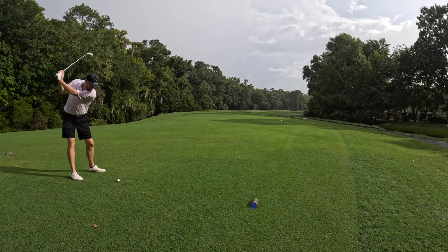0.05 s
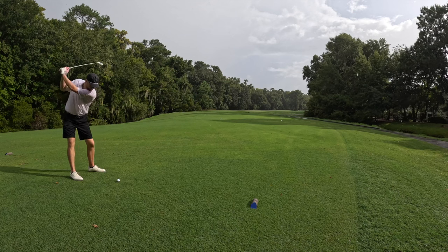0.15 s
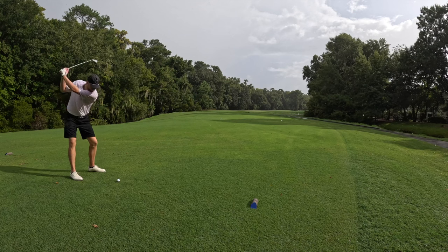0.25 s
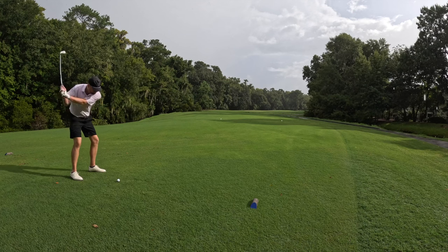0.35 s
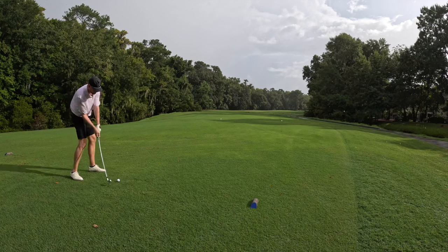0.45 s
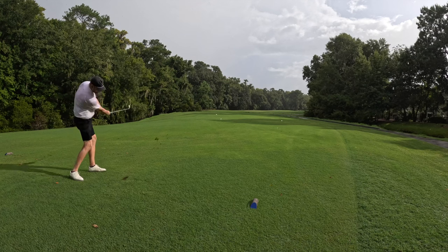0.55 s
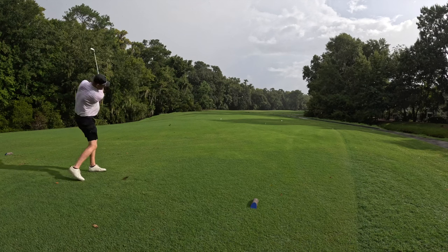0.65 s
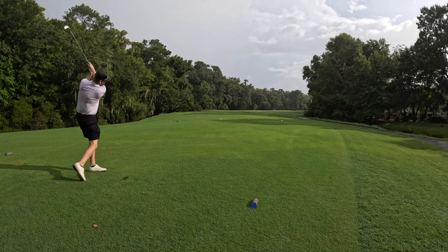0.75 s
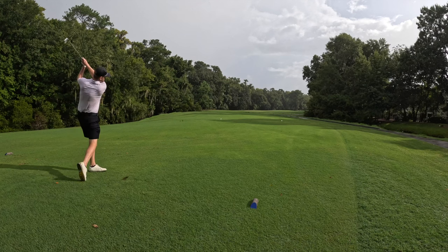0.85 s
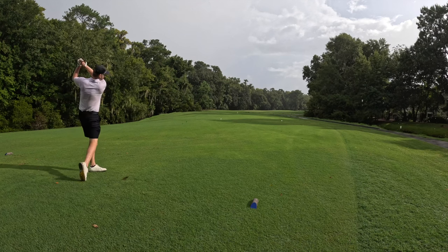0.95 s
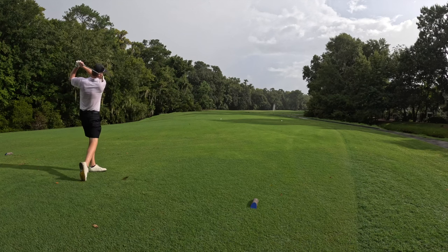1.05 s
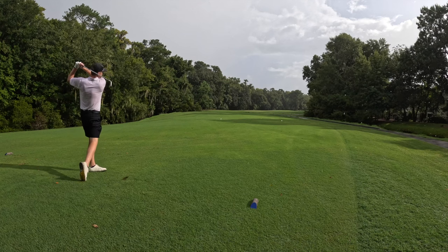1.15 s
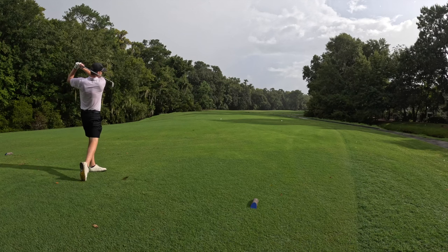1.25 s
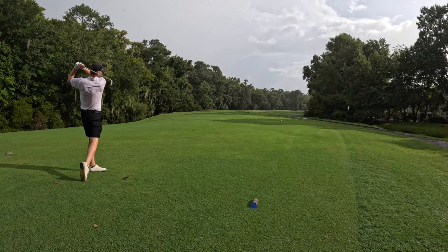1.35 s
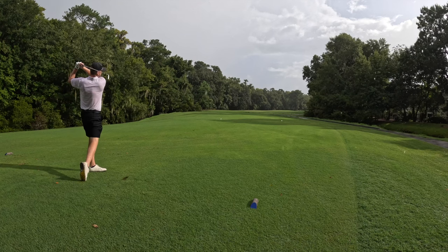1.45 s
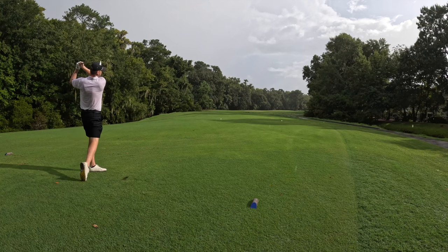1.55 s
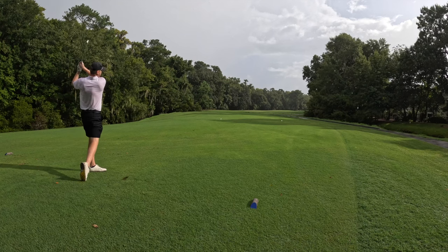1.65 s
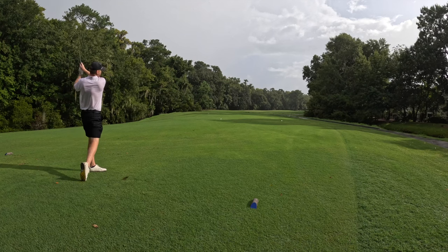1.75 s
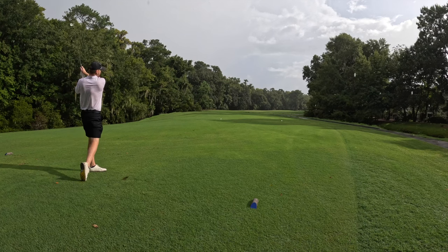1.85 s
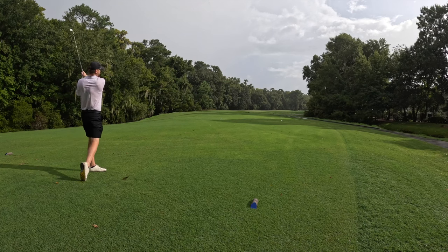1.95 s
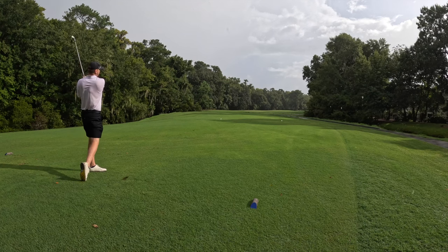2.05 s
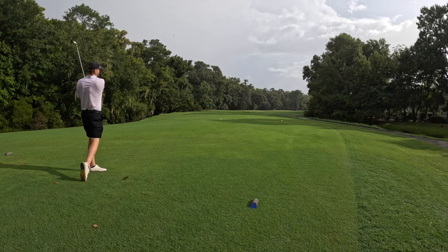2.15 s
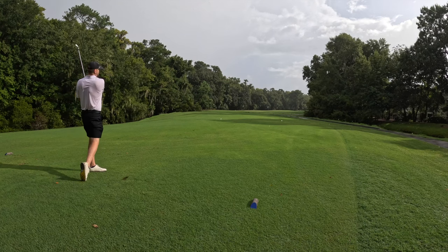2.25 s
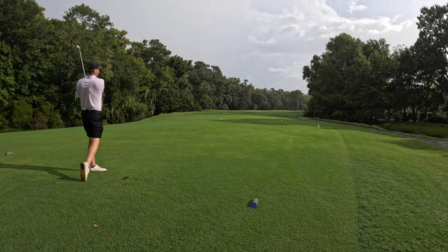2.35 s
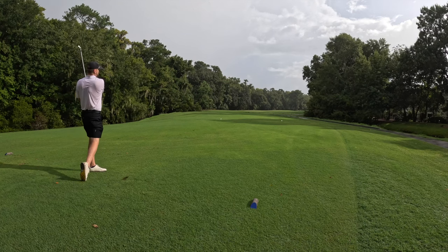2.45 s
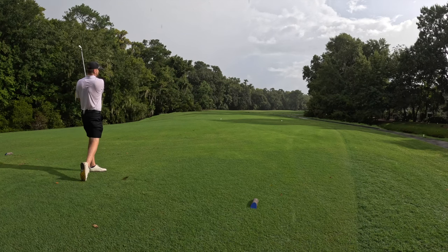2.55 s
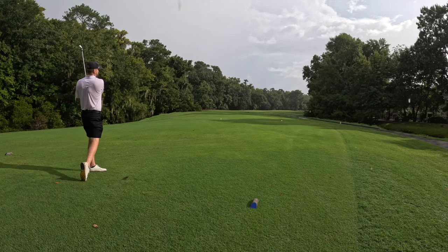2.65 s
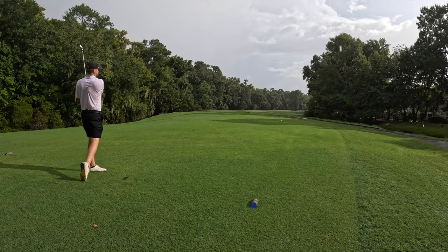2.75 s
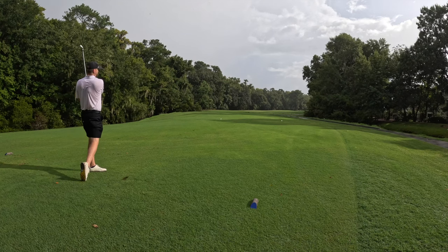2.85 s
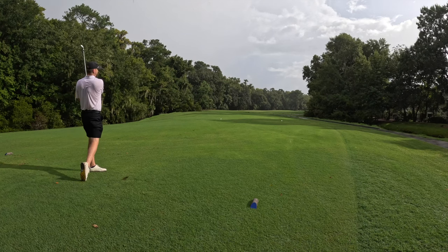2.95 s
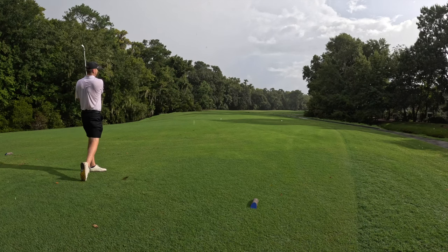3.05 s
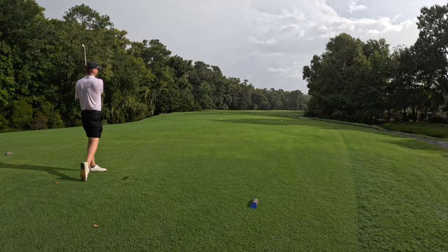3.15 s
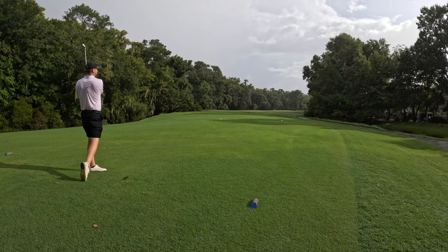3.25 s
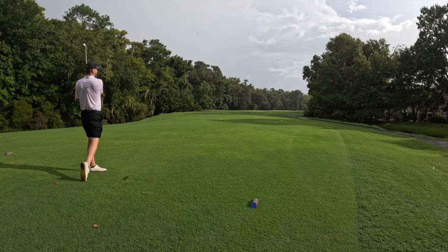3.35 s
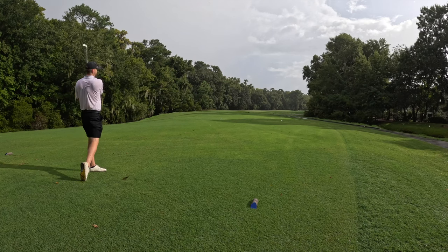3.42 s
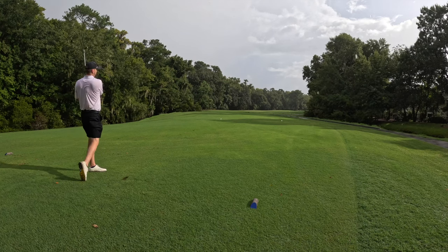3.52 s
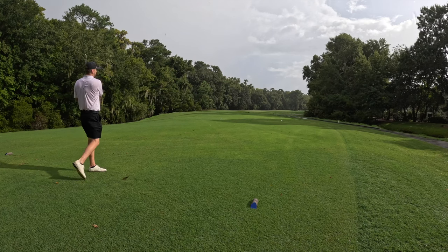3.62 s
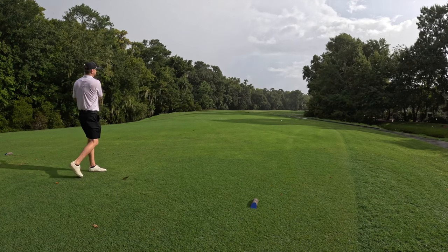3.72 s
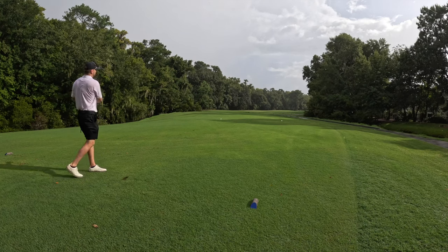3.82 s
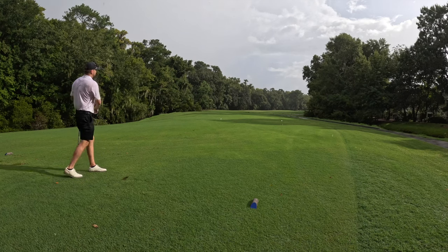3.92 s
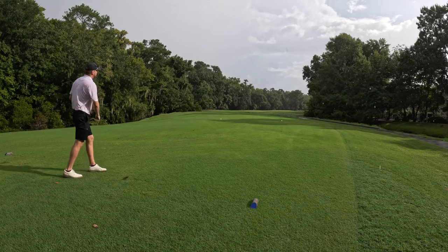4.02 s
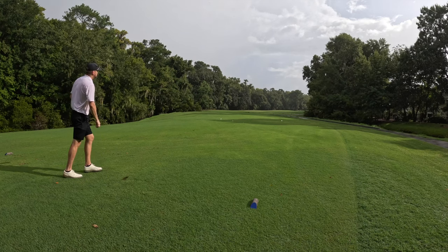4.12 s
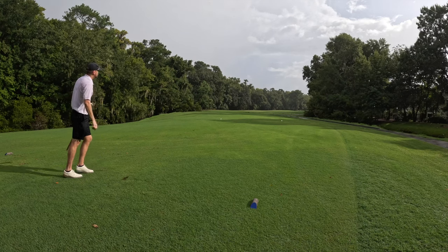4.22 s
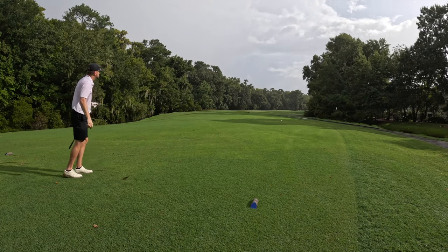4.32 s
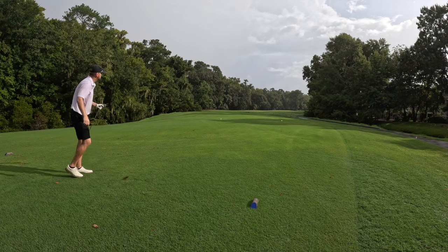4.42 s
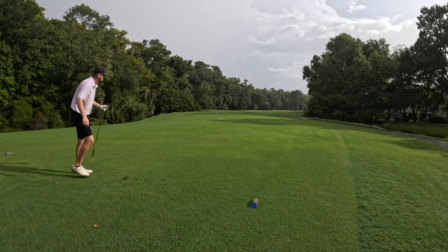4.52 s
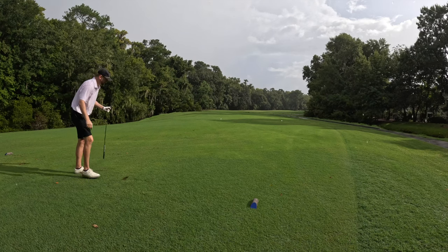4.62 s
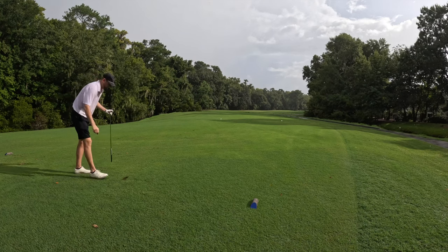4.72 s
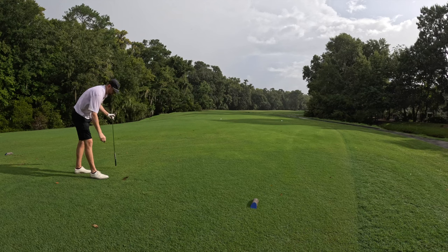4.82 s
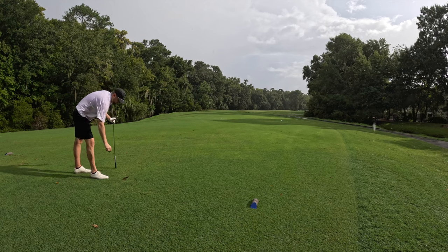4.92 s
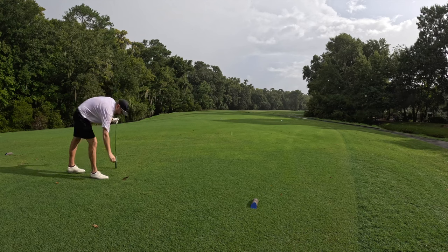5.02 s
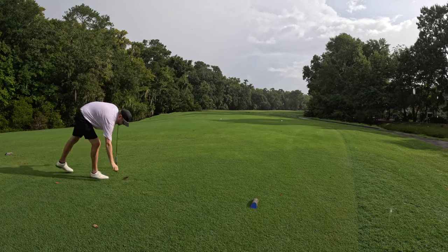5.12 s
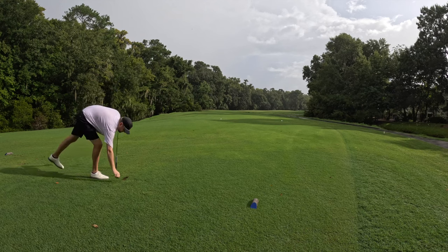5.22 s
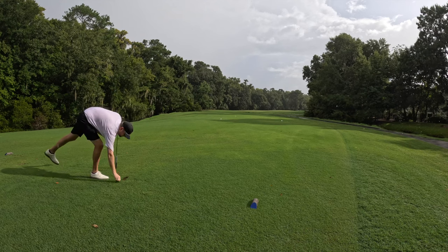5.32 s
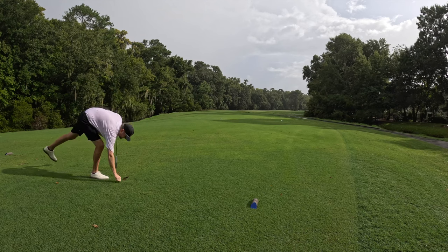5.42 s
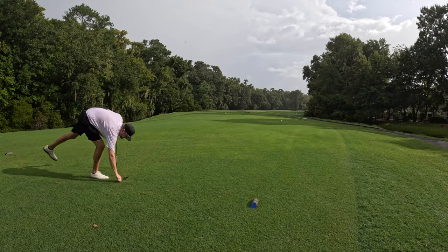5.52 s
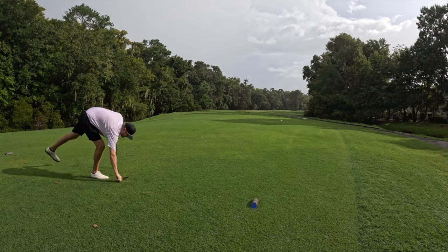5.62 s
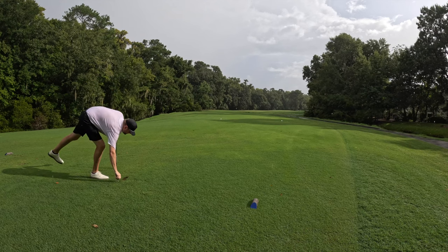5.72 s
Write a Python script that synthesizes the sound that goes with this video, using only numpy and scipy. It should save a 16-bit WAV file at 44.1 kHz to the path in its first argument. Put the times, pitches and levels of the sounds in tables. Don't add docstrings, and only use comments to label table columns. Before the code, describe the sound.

A golf club whooshes and cracks a ball off turf between two hoarse crow caws, then quiet fairway air, small bird chirps and bumps on the camera stand.

```python
import sys
import numpy as np
from scipy import signal
from scipy.fft import rfft, irfft
from scipy.io import wavfile
from scipy.ndimage import uniform_filter1d

SR = 44100
rng = np.random.default_rng(int(sys.argv[2]) if len(sys.argv) > 2 else 0)


def nominal_scale(level):
    x = np.asarray(level, float) / 20
    return 10 ** x


def output_pcm(signal):
    pcm = np.clip(np.atleast_2d(signal).T, -1, 1) * 32767
    wavfile.write(sys.argv[1], SR, np.round(pcm).astype(np.int16))


N = 254456
STRIKE_S = .571814

# frequency in Hz, level in dB per Hz.
LEAF_SPECTRUM = [(150, -6.5), (250, -3.5), (400, -5), (800, -5.5), (1050, -2), (1400, -3), (2780, -7.5),
                 (6250, -13), (7600, -16), (8300, -21), (10200, -26), (10900, -37.5), (12300, -32),
                 (14500, -41), (15300, -53)]
# frequency in Hz, level in dB per Hz.
TRAFFIC_SPECTRUM = [(38, -26), (65, -1.5), (92, 0.5), (119, -8.5), (188, -8.5), (226, -11.5), (295, -23.5),
                    (323, -36.5), (400, -24), (520, -47), (880, -120)]
# frequency in Hz, level in dB per Hz.
GUST_SPECTRUM = [(10, -12), (20, -5), (38, 9), (60, 2.5), (75, -6.5), (110, -48.5)]
# centre in seconds, level in dB, half length in seconds.
STIRS = [
    (.3, -53, .2),
    (.76, -54, .12),
    (2.7, -56, .8),
    (4.6, -55.5, 1.3),
]
# centre in seconds, level in dB, half length in seconds.
PASSES = [
    (.13, -52, .06),
    (.55, -55, .2),
    (1.55, -58, .3),
    (2.6, -54, .4),
    (3.45, -53, .12),
    (4.25, -52, .45),
    (5.75, -50, .3),
]
# centre in seconds, level in dB, half length in seconds.
GUSTS = [(.0, -53, .1), (.3, -48, .07), (.65, -45, .17), (1.2, -57, .15), (1.72, -45.5, .12),
         (2.25, -48, .1), (2.52, -46.5, .1), (3.4, -51, .2), (3.95, -48, .15), (4.49, -48, .08),
         (4.7, -54, .12), (5.3, -47, .1)]
# frequency in Hz, left-right correlation 0-1.
STEREO_LIKENESS = [(60, .99), (130, .965), (290, .89), (640, .74), (1410, .63), (3100, .49), (4400, .6),
                   (4800, .968), (6400, .972), (7300, .958), (9300, .96), (11000, .35)]
# frequency in Hz, left over right in dB.
STEREO_LEAN = [(60, -.8), (200, -1.5), (380, -.8), (700, .5), (1290, 1.5), (2380, 1.5), (4700, 0),
               (9600, 0), (12000, 2.5)]
# start in seconds, nasal part in seconds, rattle in seconds, effort in dB, top pitch in Hz.
CAWS = [
    (.08, .115, .2, -47.5, 612),
    (.708, .13, .19, -50, 605),
]
# resonance in Hz, width in Hz, level in dB.
THROAT_CLEAR = [(1200, 300, 0), (1780, 350, -4), (3550, 350, -16), (5200, 900, -19)]
# resonance in Hz, width in Hz, level in dB.
THROAT_RATTLE = [(1360, 190, 0), (1710, 200, -7), (3550, 350, -15), (5200, 900, -17)]
# time in seconds, peak in dB, left over right in dB, size 0-1.
DROPS = [(.39, -52, 10, .1), (1.482, -42.5, 20, 0.5), (2.608, -42, 22, 0.44), (2.709, -54, 6, .1),
         (2.81, -49, 10, .15), (2.8138, -33, 14, 1), (4.398, -52, 13, .05), (4.596, -36.5, 18, 0.6),
         (4.907, -49, 12, 0), (4.9245, -54, 12, .05), (5.5378, -41, 21, 0.58)]
# frequency in Hz, level in dB, decay by 60 dB in seconds.
HOUSING_MODES = [(1300, 0, .004), (3600, -2, .002), (7100, 0, .002), (9500, -10, .0015), (12300, -9, .002)]
# frequency in Hz, level in dB per Hz.
HEAD_SPECTRUM = [(470, -27), (800, -1), (1690, -9.5), (2080, -10), (2330, -13.5), (4680, -19.5),
                 (5620, -21), (8030, -25.5), (15000, -59)]
# frequency in Hz, level in dB, decay by 60 dB in seconds.
BALL_MODES = [(860, -14, .014), (1280, 11, .003), (1700, -9.5, .01), (2000, -14, .015), (2920, 1, .0042)]
# frequency in Hz, level in dB, decay by 60 dB in seconds.
FACE_MODES = [(3930, 11.5, .0015), (5150, 15, .0019), (7240, 11.5, .0029), (8140, 13, .0015),
              (10200, 1, .002), (12050, -10, .0035), (14500, -10, .002)]
# frequency in Hz, level in dB per Hz.
TURF_SPECTRUM = [(250, -30), (500, -13), (1000, -11), (1900, -4), (3400, -10), (4900, -5), (6200, -12),
                 (9300, -13), (10700, -26), (15000, -42)]
# frequency in Hz, level in dB per Hz.
TREE_SPECTRUM = [(880, -31), (1500, 1), (1770, -15), (2800, -9), (3310, -3), (3650, -2), (5400, -0.5),
                 (7600, -3.5), (15500, -32.5)]
# top in seconds, top in dB, rise in dB/s, hold in seconds, fall in dB/s.
WHISTLE_ENV = (.526, -28.5, 800, .017, 380)
HEAD_ENV = (.533, -31.5, 550, .008, 200)
TEAR_ENV = (.5742, -22.5, 12000, .003, 2100)
THUMP_ENV = (.576, -29, 2000, .02, 1100)
ROLL_ENV = (.6, -38, 1700, .07, 130)
ECHO_ENV = (.66, -49.5, 500, .16, 85)
# start in seconds, length in seconds, first pitch in Hz, last pitch in Hz, level in dB.
BIRD_NOTES = [(1.527, .026, 6000, 7850, -55), (2.146, .016, 5900, 7800, -55),
              (3.665, .088, 7520, 7480, -58), (3.753, .044, 7520, 7950, -57),
              (3.793, .014, 7700, 7550, -56), (3.88, .022, 7300, 7120, -54), (3.9, .06, 7120, 7180, -51),
              (3.96, .085, 7200, 7120, -61), (4.05, .06, 7120, 7080, -65), (3.893, .03, 7350, 7650, -62),
              (3.943, .018, 6950, 6500, -61), (4.74, .03, 6500, 7700, -59)]
# time in seconds, sway in dB, knock in dB, length in seconds, knock pitch factor.
BUMPS = [
    (4.681, -32, -39, 0.035, 0.98),
    (4.725, -44, -41, 0.014, 0.65),
    (4.952, -47, -41, 0.019, 0.71),
    (5.054, -45, -48, 0.021, 2.1),
    (5.428, -26.5, -38, .031, 1.08),
    (5.489, -27, -41, 0.023, 0.98),
    (5.527, -34, -48, .015, 0.69),
    (5.615, -46, -41, 0.022, 0.68),
]
# resonance in Hz, width in Hz, level in dB.
STAND_SWAY = [(84.5, 43, -7), (165, 70, 0.5), (294, 100, -17)]
# resonance in Hz, width in Hz, level in dB.
STAND_KNOCK = [(443, 200, 2), (610, 80, -3), (960, 160, -6.5), (1520, 450, -11)]


def evened(x):
    return x / np.sqrt(np.mean(x ** 2) + 1e-20)


def read(points, hz):
    f, value = np.transpose(points)
    return np.interp(np.log(hz + 1), np.log(f + 1), value)


def span(start_s, length_s):
    return start_s + np.arange(round(length_s * SR)) / SR


def shape(t, top_s, top_db, rise, hold_s, fall):
    early_s = np.maximum(top_s - t, 0)
    late_s = np.maximum(t - top_s - hold_s, 0)
    return nominal_scale(top_db - rise * early_s - fall * late_s)


def add(mix, start_s, sound, lean_db=0):
    part = mix[:, round(start_s * SR):][:, :sound.shape[-1]]
    gains = nominal_scale(np.array([[.5], [-.5]]) * lean_db)
    part += (sound * gains)[:, :part.shape[1]]


def resonate(x, hz, width_hz):
    turn = np.exp(2j * np.pi * np.cumsum(hz * np.ones(len(x))) / SR)
    r = np.exp(-np.pi * width_hz / SR)
    smooth = signal.lfilter([(1 - r) ** 2], [1, -2 * r, r * r], x / turn)
    return 2 * (turn * smooth).real


def through(x, peaks):
    return sum((-1) ** k * nominal_scale(db) * resonate(x, hz, width_hz) for k, (hz, width_hz, db) in enumerate(peaks))


def steadied(x, share):
    envelope = abs(signal.hilbert(evened(x))) + .1
    return evened(x / envelope ** share)


def ring(modes, weights, rise_s):
    t = np.arange(1500) / SR
    sines = 0
    for weight, (hz, db, t60_s) in zip(weights, modes):
        sines = sines + weight * nominal_scale(db - 60 * t / t60_s) * np.sin(2 * np.pi * hz * t)
    return sines * (1 - np.exp(-t / rise_s)) ** 2


def burst(size, spectrum, same=.95):
    a, b = rng.standard_normal((2, size + 2048))
    pair = np.array([a, same * a + np.sqrt(1 - same ** 2) * b])
    hz = np.fft.rfftfreq(size + 2048, 1 / SR)
    coloured = irfft(rfft(pair) * nominal_scale(read(spectrum, hz)), size + 2048)
    return evened(coloured[:, :size])


def swells(calm_db, rows):
    t = np.arange(N) / SR
    bells = sum(nominal_scale(2 * db) * np.exp(-((t - s) / half_s) ** 2) for s, db, half_s in rows)
    return 10 * np.log10(nominal_scale(2 * calm_db) + bells)


def field(spectrum, level_db, patchy_db):
    frames, hz = N // 512 + 5, np.fft.rfftfreq(2048, 1 / SR)
    a, b, c, d, patches = rng.standard_normal((frames, 1025, 5)).T
    patches = uniform_filter1d(patches, size=20, axis=0)
    patches = evened(uniform_filter1d(patches, size=8, axis=1))
    same = read(STEREO_LIKENESS, hz)[:, None]
    left = a + 1j * b
    z = np.array([left, same * left + np.sqrt(1 - same ** 2) * (c + 1j * d)])
    lean_db = np.multiply.outer([.5, -.5], read(STEREO_LEAN, hz))[..., None]
    z *= nominal_scale(read(spectrum, hz)[:, None] + patchy_db * patches + lean_db)
    noise = signal.istft(z, nperseg=2048, noverlap=1536)[1][:, :N]
    return nominal_scale(level_db) * evened(noise)


def leaves():
    return nominal_scale(3.5) * field(LEAF_SPECTRUM, swells(-53.5, STIRS), patchy_db=1.07)


def traffic():
    return nominal_scale(3.5) * field(TRAFFIC_SPECTRUM, swells(-58, PASSES), patchy_db=1.0)


def wind():
    return field(GUST_SPECTRUM, swells(-56, GUSTS), patchy_db=0.7)


def woods(x, wet_db, t60_s):
    t = np.arange(SR // 4) / SR
    hits = rng.standard_normal((2, len(t))) * (rng.random((2, len(t))) < .05)
    taps = hits * nominal_scale(-60 * t / t60_s)
    wet = signal.fftconvolve(x[None], taps / np.linalg.norm(taps[0]), axes=1)
    return nominal_scale(wet_db) * wet + np.pad(x, (0, len(t) - 1))


def crow(start_s, nasal_s, rattle_s, effort_db, top_hz):
    rattle_hz, arch_share, break_s = 59.7, .12, .04
    hoarse, rattling = .32, .95
    rise_db_per_s, sag_db_per_s, fall_db_per_s = 800, 6, 100
    t = span(0, .6)
    arch = np.minimum(abs(2 * (t / nasal_s) ** .7 - 1), 1) ** 2.5
    hz = top_hz * (1 - arch_share * arch)
    rattle = hoarse + (rattling - hoarse) * np.clip((t - nasal_s) / break_s + .5, 0, 1)
    effort = shape(t, .02, effort_db, rise_db_per_s, nasal_s + rattle_s, fall_db_per_s)
    effort = effort * nominal_scale(-sag_db_per_s * t)
    wobble = evened(uniform_filter1d(rng.standard_normal((2, len(t))), size=200))
    turns = np.cumsum(hz * (1 + .026 * wobble[0])) / SR
    harmonics = sum(np.cos(2 * np.pi * k * turns) for k in range(1, 11))
    clear = through(harmonics, THROAT_CLEAR)
    beats = np.cumsum(rattle_hz * (1 + .04 * wobble[1])) / SR
    pulses = np.diff(np.floor(beats), prepend=0)
    puffs = np.exp(-(beats % 1) / .4) * rng.standard_normal(len(t))
    rough = through(evened(pulses) + 1.2 * evened(puffs), THROAT_RATTLE)
    voice = effort * (np.sqrt(1 - rattle) * evened(clear) + np.sqrt(rattle) * evened(rough))
    return start_s, woods(voice * signal.windows.tukey(len(t), .05), wet_db=-2, t60_s=.25)


def drop_tick(size):
    weights = [size ** 4, size ** 2, size, size, 1 - .9 * size]
    click = ring(HOUSING_MODES, weights, rise_s=.0001)
    return click / abs(click).max()


def swing():
    swing_s, shaft_hz, speed_up_hz_per_s = .085, 700, 4400
    t = span(STRIKE_S - swing_s, swing_s)
    hz = shaft_hz - speed_up_hz_per_s * (STRIKE_S - t)
    shed = rng.standard_normal((2, SR // 8))[:, :len(t)]
    shaft = resonate(steadied(resonate(shed[0], hz, 140), share=.8), hz, 300)
    tip = evened(resonate(shed[1], 1.35 * hz, 140))
    whistle = evened(shaft + nominal_scale(-9) * tip)
    hiss = burst(SR // 8, HEAD_SPECTRUM, same=0.94)[:, :len(t)] * signal.windows.tukey(len(t), .1)
    return t[0], shape(t, *WHISTLE_ENV) * whistle + shape(t, *HEAD_ENV) * hiss


def impact(mix):
    contact_s = .00046
    add(mix, STRIKE_S, -ring(BALL_MODES, np.ones(len(BALL_MODES)), contact_s), lean_db=-1.5)
    add(mix, STRIKE_S, -ring(FACE_MODES, np.ones(len(FACE_MODES)), contact_s), lean_db=1.8)


def turf(mix):
    soil_hz, jolt_hz, settle_s = 122, 230, .0038
    t = span(STRIKE_S, 1)
    grounded = np.clip((STRIKE_S + .015 - t) / .003, 0, 1)
    add(mix, t[0], shape(t, *TEAR_ENV) * grounded * burst(len(t), TURF_SPECTRUM, same=.88))
    hz = soil_hz + jolt_hz * np.exp(-(t - t[0]) / settle_s)
    thump = np.sqrt(2) * np.sin(2 * np.pi * np.cumsum(hz) / SR)
    add(mix, t[0], shape(t, *THUMP_ENV) * thump, lean_db=-1.7)
    roll = steadied(resonate(rng.standard_normal(len(t)), 57, 55), share=.6)
    add(mix, t[0], shape(t, *ROLL_ENV) * roll, lean_db=-2.0)


def tree_echo():
    t = span(STRIKE_S, 1)
    return t[0], shape(t, *ECHO_ENV) * burst(len(t), TREE_SPECTRUM, same=.96)


def bird_note(start_s, length_s, from_hz, to_hz, level_db):
    glide_power, top_share, ends_db = 1.5, .6, 8
    u = span(0, length_s) / length_s
    hz = to_hz + (from_hz - to_hz) * (1 - u) ** glide_power
    level = shape(u, top_share, level_db, ends_db / top_share, .1, ends_db / (1 - top_share))
    flutter = evened(uniform_filter1d(rng.standard_normal((2, SR // 2)), size=250))[:, :len(u)]
    phase = 2 * np.pi * np.cumsum(hz * (1 + .003 * flutter[0])) / SR
    tone = np.sin(phase) * signal.windows.tukey(len(u), .1)
    return start_s, woods(np.sqrt(2) * level * nominal_scale(2.0 * flutter[1]) * tone, wet_db=-6, t60_s=.15)


def bump(sway_db, knock_db, length_s, pitch):
    t = np.arange(round(6 * length_s * SR)) / SR
    push = rng.standard_normal((2, SR // 2))[:, :len(t)]
    sway = steadied(through(push[0], STAND_SWAY), share=.6)
    sway = sway * np.sqrt(t / length_s) * np.exp(-(t / length_s) ** 1.36)
    knock = steadied(through(push[1], np.multiply(STAND_KNOCK, [pitch, pitch, 1])), share=.5)
    knock = knock * np.minimum(t / .002, 1) * np.exp(-t / (0.75 * length_s))
    return nominal_scale(sway_db) * sway + nominal_scale(knock_db) * knock


def scene():
    mix = leaves() + traffic() + wind()
    for row in CAWS:
        add(mix, *crow(*row), lean_db=-1.5)
    for start_s, peak_db, lean_db, size in DROPS:
        add(mix, start_s, nominal_scale(peak_db) * drop_tick(size), lean_db)
    add(mix, *swing())
    impact(mix)
    turf(mix)
    add(mix, *tree_echo())
    for row in BIRD_NOTES:
        add(mix, *bird_note(*row), lean_db=-3.5)
    for start_s, *push in BUMPS:
        add(mix, start_s, bump(*push), lean_db=-2.0)
    return mix


def low_pass(x):
    return signal.sosfilt(signal.butter(12, 16500, fs=SR, output="sos"), x)


def record(dry):
    after_s = np.maximum(np.arange(N) / SR - STRIKE_S - .013, 0)
    dip_db = -6.0 * (after_s > 0) * np.exp(-after_s / .07)
    held = np.clip(dry * nominal_scale(uniform_filter1d(dip_db, size=200)), -1, 1)
    lowpass = signal.firwin(255, 15600, window=("kaiser", 8), fs=SR)
    return low_pass(signal.oaconvolve(held, lowpass[None], "same"))


dry = scene()
out = record(dry)
output_pcm(out)
```